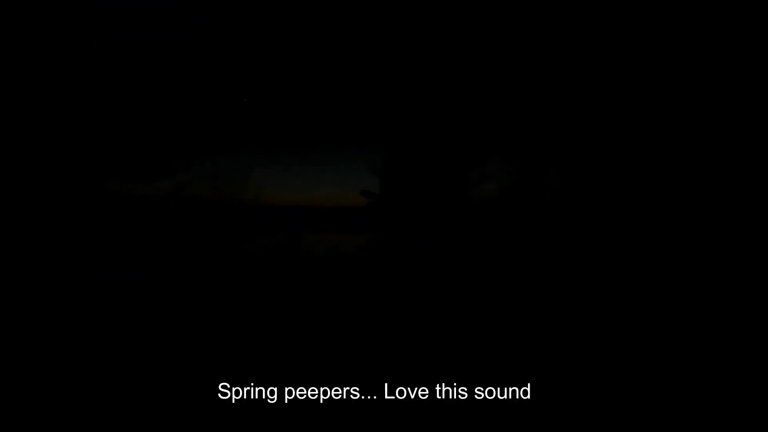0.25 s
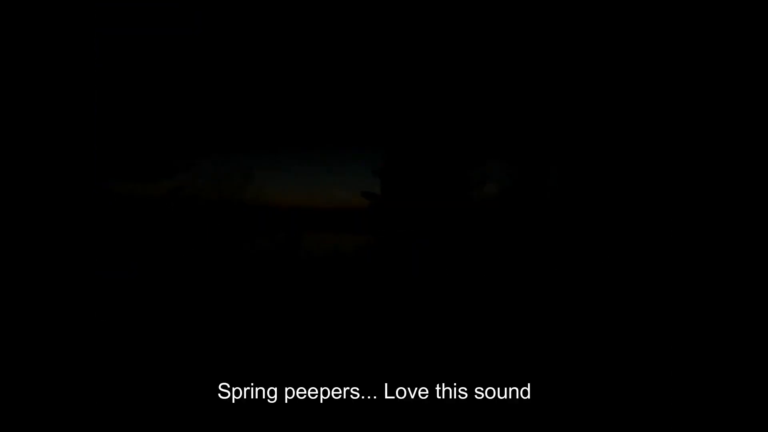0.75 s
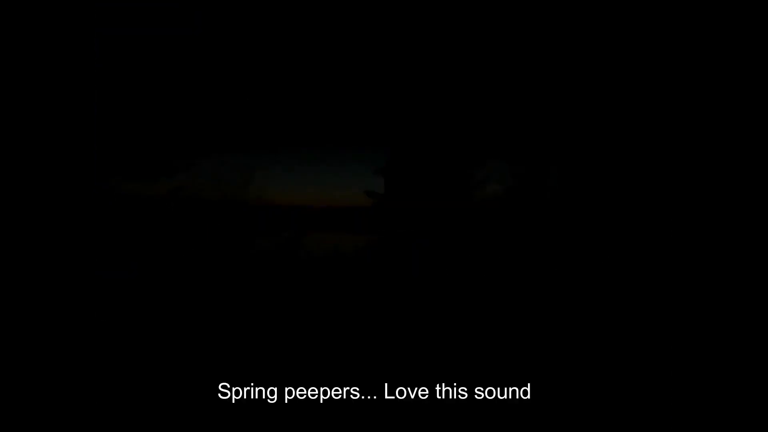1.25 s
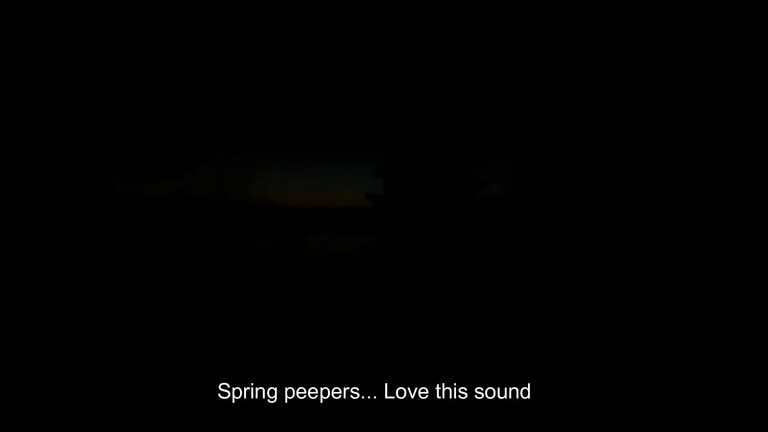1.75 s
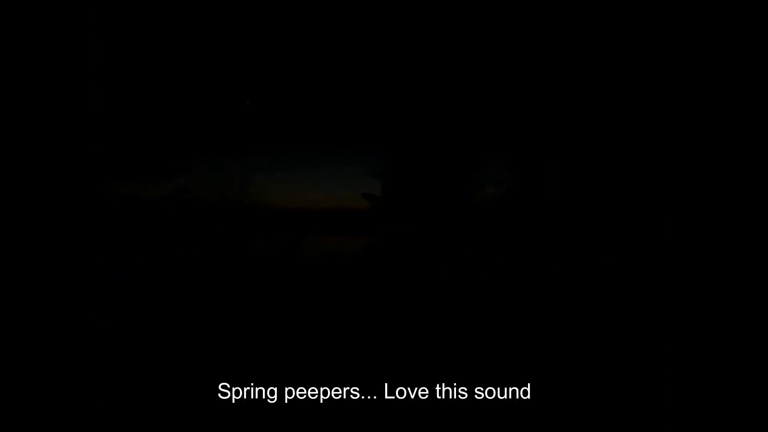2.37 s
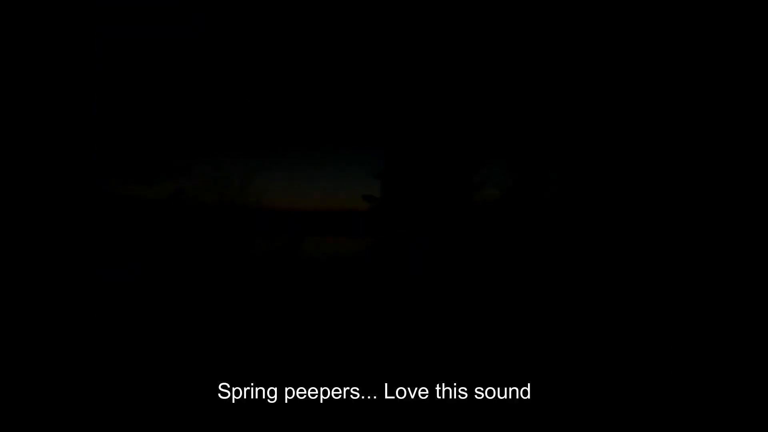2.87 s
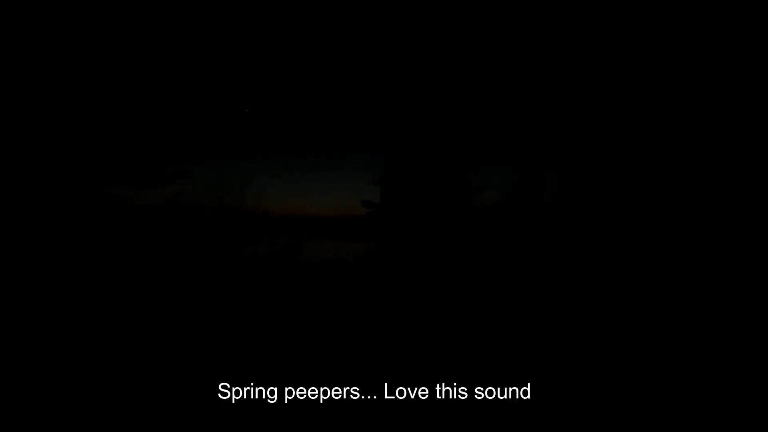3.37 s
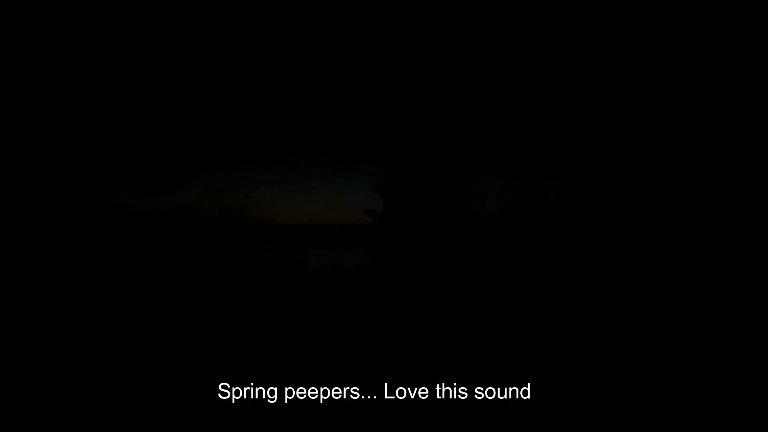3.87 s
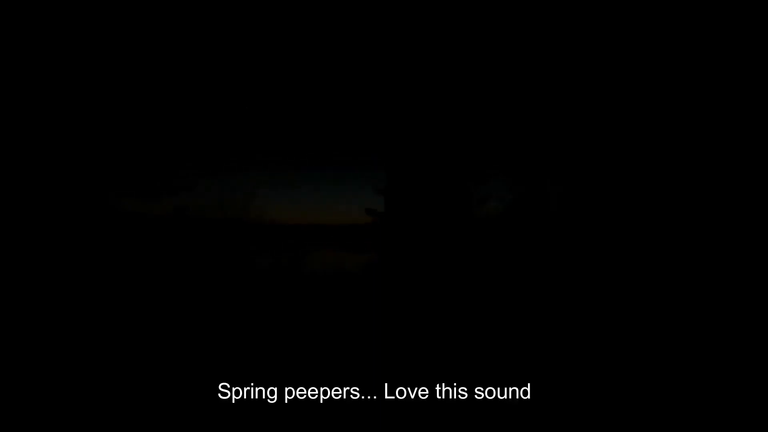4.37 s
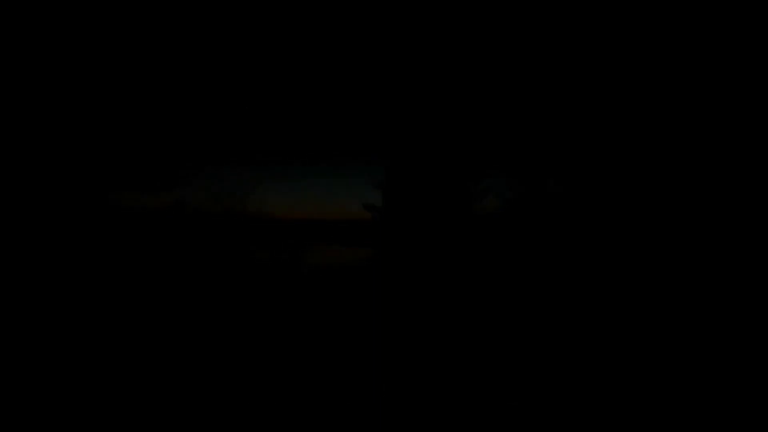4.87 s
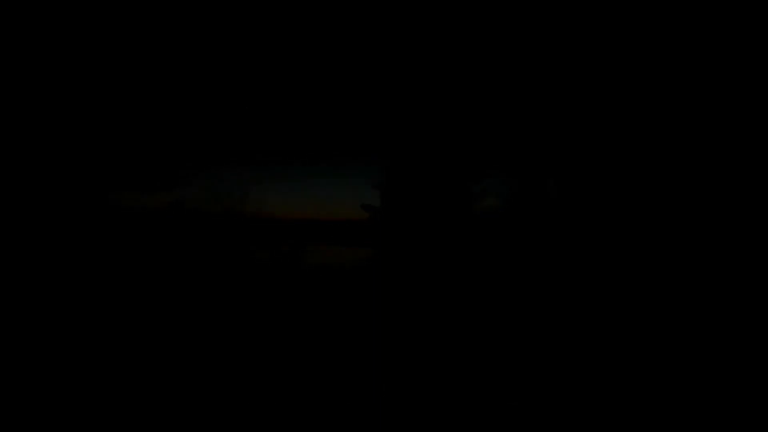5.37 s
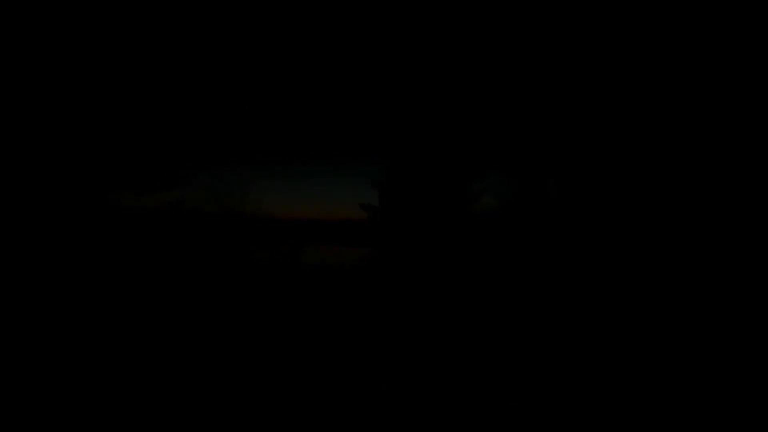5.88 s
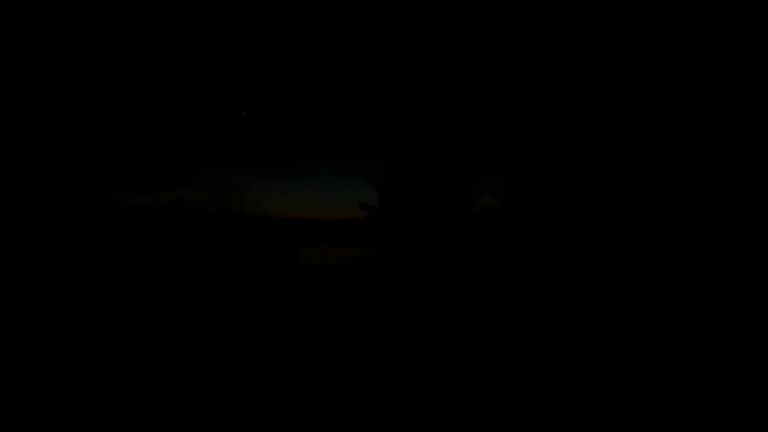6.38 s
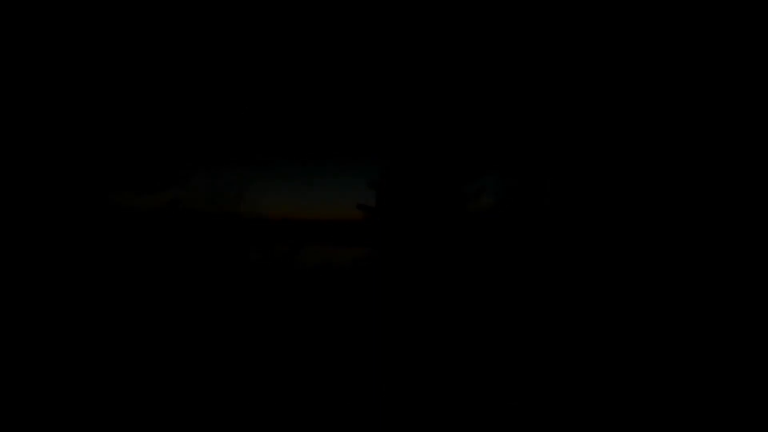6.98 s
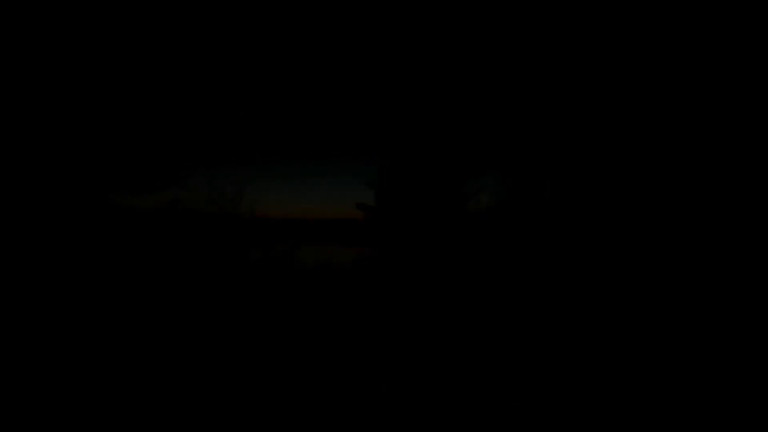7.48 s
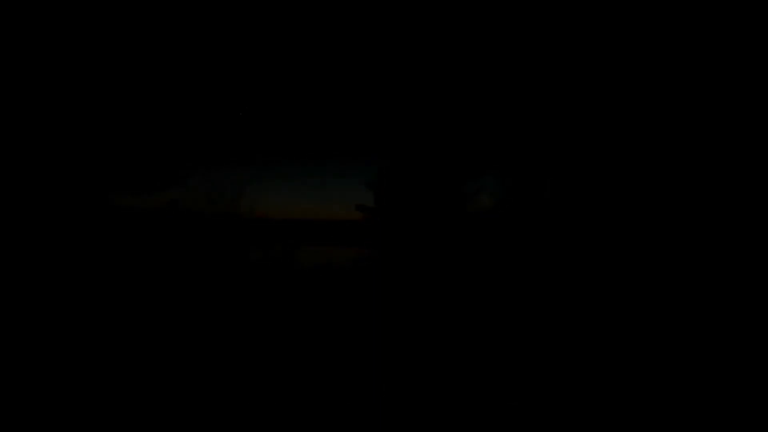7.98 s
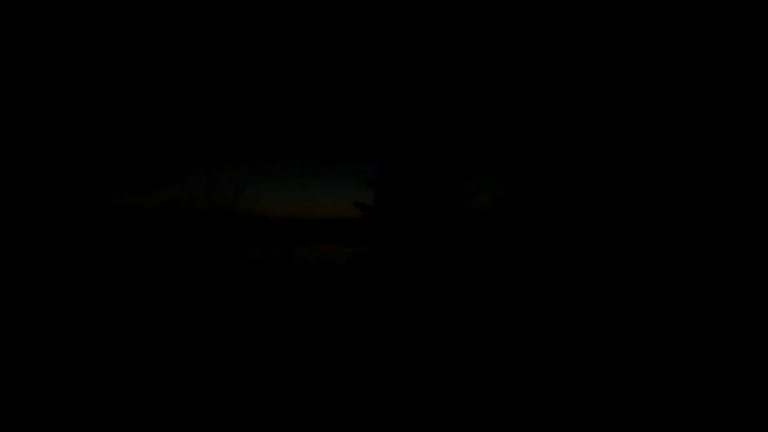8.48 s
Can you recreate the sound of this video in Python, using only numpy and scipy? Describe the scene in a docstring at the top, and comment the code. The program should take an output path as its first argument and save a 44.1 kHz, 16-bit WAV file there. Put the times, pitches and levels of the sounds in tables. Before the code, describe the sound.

Small frogs peep in overlapping clear upward whistles, one close caller repeating every second, distant others blurred behind, with low night-air hiss fading between calls.

```python
"""Spring peepers across a marsh at dusk

Each peep is a pure whistle that glides upward near 3 kHz: a sine under a swelling envelope.
A few close males repeat their own peeps; many more blur together behind them. Banks and trees scatter
the calls as sparse echoes and a diffuse noise tail, over a dark hiss of night air. A small camera hears it:
its noise suppressor slowly turns the gaps down, and its 8 kHz sampling adds glassy mirror tones.
"""
import sys
import numpy as np
from scipy import signal
from scipy.fft import rfft, irfft
from scipy.io import wavfile

SR = 44100
rng = np.random.default_rng(int(sys.argv[2]) if len(sys.argv) > 2 else 0)


def int16_out(signal):
    """Quantize to a 16-bit WAV file."""
    q = np.round(np.clip(np.atleast_2d(signal).T, -1, 1) * 32767)
    wavfile.write(sys.argv[1], SR, q.astype(np.int16))


N = 385434  # length in samples
SAMPLING_HZ = 8000


def undb(db):
    """Amplitude ratio from decibels: twenty decibels per factor of ten."""
    return 10 ** (np.asarray(db) / 20)


def curve(rows):
    """Linear interpolation in time through rows of (seconds, value)."""
    return np.interp(np.arange(N) / SR, *np.transpose(rows))


def add(track, start_s, sound):
    """Superposition: pressures sum, and whatever falls outside the track is dropped."""
    start = int(start_s * SR)
    first, last = max(start, 0), min(start + len(sound), N)
    if last > first:
        track[first:last] += sound[first - start:last - start]


def smooth(x, lag_s):
    """First-order relaxation: the output approaches its input exponentially."""
    keep = np.exp(-1 / (lag_s * SR))
    return signal.lfilter([1 - keep], [1, -keep], x)


def peep(length_s, start_hz, end_hz, bend=0.689, release_s=0.0095, swell_db=3.5, crest=0.43):
    """Frequency modulation: one squeeze of the vocal sac swells and climbs, its rise slowing near the end."""
    t = np.arange(int(length_s * SR)) / SR
    progress = t / length_s
    glide = progress + bend * progress ** 2 * (1 - progress)
    hz = start_hz + (end_hz - start_hz) * glide
    attack = np.minimum(t / .007, 1)
    release = np.minimum((length_s - t) / release_s, 1)
    swell = undb(-swell_db * ((progress - crest) / crest) ** 2)
    push = attack * release * swell
    push = push / np.sqrt(np.mean(push ** 2))  # unit RMS envelope
    phase = 2 * np.pi * np.cumsum(hz) / SR
    return push * np.sin(phase)


def scatter(call, echo_db, spread_s=.06, count=10):
    """Multipath interference: late copies from stems and banks beat with the gliding call as a flutter."""
    lags = rng.uniform(size=count)
    sizes = rng.standard_normal(count) * np.exp(-lags)  # later copies tend to be weaker
    delays_s = (.08 + .92 * lags) * spread_s
    paths = np.zeros(int(spread_s * SR) + 2)
    paths[(delays_s * SR).astype(int)] = undb(echo_db) * sizes / np.linalg.norm(sizes)
    paths[0] = 1  # direct sound
    return signal.fftconvolve(call, paths)


def near_frogs(level_db=1.2):
    """Discrete sources: each voice repeats its own peep at varying strength, with new echoes each time."""
    # The voices that stand out. Each entry: peep length in seconds, start pitch in Hz, end pitch in Hz,
    # scattered echo in dB relative to the direct sound.
    voices = {"leader": (.158, 2765, 3085, -17), "low": (.136, 2675, 2982, -12),
              "steep": (.115, 2795, 3105, -13), "shrill": (.125, 2855, 3270, -14),
              "bright": (.11, 2865, 3130, -9), "short_high": (.095, 2925, 3135, -8),
              "flat": (.11, 2805, 2975, -7), "far_low": (.145, 2680, 2935, -8),
              "far_long": (.145, 2775, 3055, -7)}
    # The peeps of each voice. Each row: start in seconds, level in dB before the common level_db.
    peeps = {"leader": [(.449, -41.5), (1.53, -41.5), (2.482, -41.5), (3.469, -42.5), (4.476, -42.5),
             (5.447, -42.5), (6.466, -42), (7.48, -42.5), (8.532, -41.5)], "low": [(.044, -48.5),
             (.963, -46.5), (1.922, -47.5), (3.122, -47.5), (4.194, -49.5), (5.16, -47), (6.008, -46),
             (6.932, -46.5), (7.856, -47.5)], "steep": [(.236, -47.5), (1.95, -46), (2.71, -46),
             (3.86, -48), (5.666, -49)], "shrill": [(6.485, -47.5), (7.465, -46), (8.247, -47)],
             "bright": [(1.184, -51.5), (1.358, -56), (2.015, -46.5), (3.4, -48.5), (4.228, -52),
             (5.855, -51.5), (8.139, -52)], "short_high": [(.562, -51.5), (.708, -57.5), (1.84, -55.5),
             (2.205, -57), (2.698, -48.5), (2.925, -55.5), (5.024, -51), (6.137, -56.5), (6.696, -53),
             (8.331, -51)], "flat": [(.12, -56), (.317, -53.5), (.793, -51.5), (1.095, -55), (1.79, -53),
             (2.939, -51.5), (4.095, -52), (4.733, -59), (5.345, -58), (5.935, -53), (7.344, -55),
             (8.44, -56)], "far_low": [(1.725, -51), (2.87, -56), (4.045, -51), (5.232, -51.5),
             (6.765, -51), (7.62, -55), (8.29, -51.5)], "far_long": [(.635, -51), (4.801, -53.5),
             (6.267, -55.5), (7.21, -53.5)]}
    out = np.zeros(N)
    for name, (length_s, start_hz, end_hz, echo_db) in voices.items():
        call = peep(length_s, start_hz, end_hz)
        for start_s, db in peeps[name]:
            add(out, start_s, undb(db + level_db) * scatter(call, echo_db))
    return out


def far_frogs(level_db=-58.0, start_hz=2800, spread_hz=75, rise_hz=240, length_s=.125, spread_db=2.0, count=16):
    """Incoherent summation: distant males of differing pitch and loudness each peep about once a second."""
    out = np.zeros(N)
    for _ in range(count):
        voice, loudness, pace = np.clip(rng.standard_normal(3), -1.7, 1.7)
        intervals_s = np.exp(.12 * (pace + rng.standard_normal(14)))
        times = np.cumsum(intervals_s) - 2 - rng.uniform()  # the chorus is already under way at time zero
        hz = start_hz + spread_hz * voice
        call = scatter(peep(length_s, hz, hz + rise_hz), echo_db=-9.5)
        for start_s in times:
            add(out, start_s, undb(spread_db * loudness) * call)
    return out * undb(level_db) / np.std(out)


def woods(x, t60_s=0.66, build_s=0.017):
    """Diffuse reverberation: trees around the water answer with a noise tail that builds, then decays."""
    t = np.arange(SR) / SR
    decay = np.exp(-np.log(1000) * t / t60_s)  # 60 dB down after t60_s
    build = 1 - np.exp(-t / build_s)
    tail = rng.standard_normal(SR) * decay * build
    return signal.fftconvolve(x, tail / np.linalg.norm(tail))[:N]


def night_air(level_db=-49.5):
    """Spectral shaping of white noise: a steady, dark hiss, band-limited to half the sampling rate."""
    # Night air and microphone hiss. Each row: frequency in Hz, relative spectral density in dB per Hz.
    spectrum = [(20, 2), (45, -2.5), (100, -8), (200, -12.5), (500, -18.5), (1000, -23), (1500, -24.5),
                (2000, -28.5), (2500, -27.5), (2900, -19.5), (3300, -35), (3900, -36)]
    points_hz, db = np.transpose(spectrum)
    hz = np.arange(N // 2 + 1) * SR / N
    colour = undb(np.interp(np.log(hz + 1), np.log(points_hz), db))
    colour = colour * (hz < SAMPLING_HZ / 2)
    hiss = irfft(rfft(rng.standard_normal(N)) * colour, N)
    return hiss * undb(level_db) / np.std(hiss)


def scene(woods_db=-12):
    """Linear superposition of near and far frogs, their echo from the trees, and the air."""
    frogs = near_frogs() + far_frogs()
    return (frogs + undb(woods_db) * woods(frogs) + night_air())[None]


def suppress(x, open_db=-44, lag_s=0.088):
    """Downward expansion: loud peeps lift the gain, and the hiss swells with them."""
    # The suppressor settles in. Each row: time in seconds, gain in dB applied at the reference closure.
    suppression = [(0, 0), (2.5, -0.5), (3.3, -3), (4.2, -6), (5.0, -10.5), (6.2, -12.5), (7.2, -13),
                   (8.7, -14.5)]
    power = smooth(smooth(x ** 2, lag_s), lag_s / 10)
    closure = 1 / (1 + power / undb(open_db) ** 2)
    closure = closure / np.quantile(closure, .9)  # the quietest moments get the full suppression
    return x * undb(curve(suppression) * closure)


def record(dry, offset=0.099, settle_s=1.346, top_hz=15400):
    """Spectral imaging: after suppression and a draining offset, straight-line joins mirror peeps upward."""
    t = np.arange(N) / SR
    ticks = np.arange(0, N / SR, 1 / SAMPLING_HZ)
    sound = suppress(dry[0]) + offset * np.exp(-t / settle_s)
    samples = np.interp(ticks, t, sound)
    coarse = np.interp(t, ticks, samples)
    low_pass = signal.ellip(8, .2, 70, top_hz, fs=SR, output="sos")  # .2 dB ripple, 70 dB stopband
    return signal.sosfilt(low_pass, coarse)[None]


dry = scene()
out = record(dry)
int16_out(out)
```